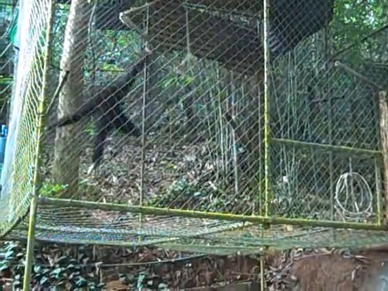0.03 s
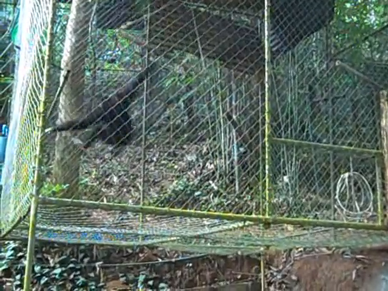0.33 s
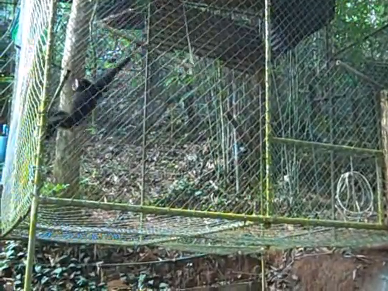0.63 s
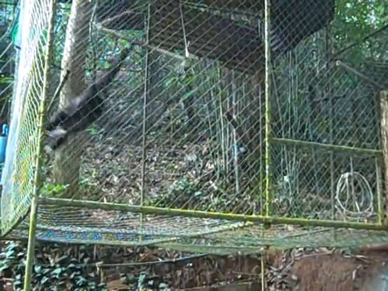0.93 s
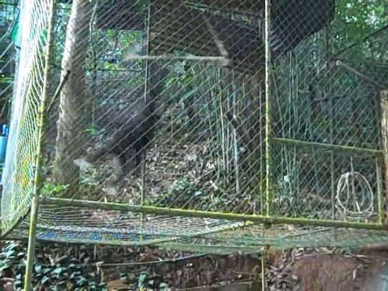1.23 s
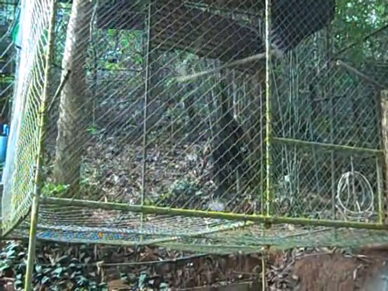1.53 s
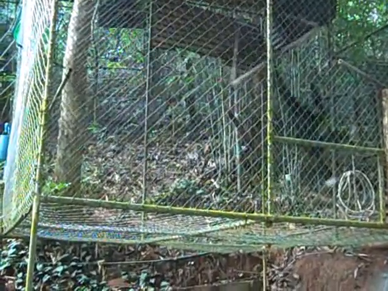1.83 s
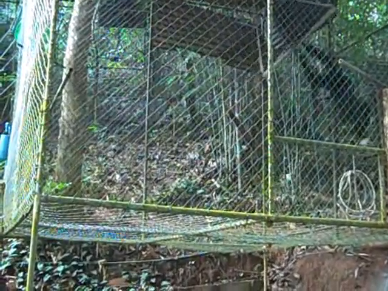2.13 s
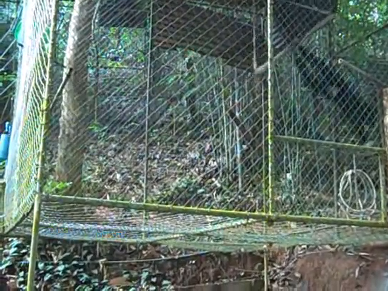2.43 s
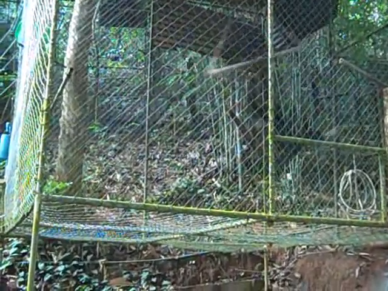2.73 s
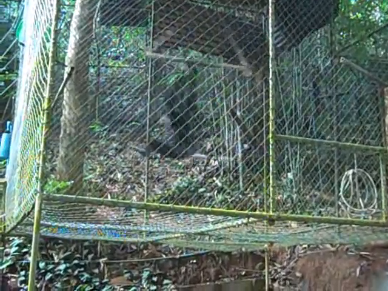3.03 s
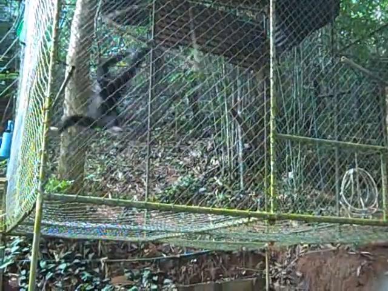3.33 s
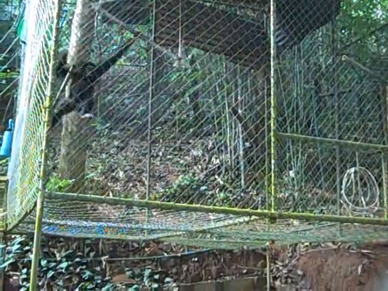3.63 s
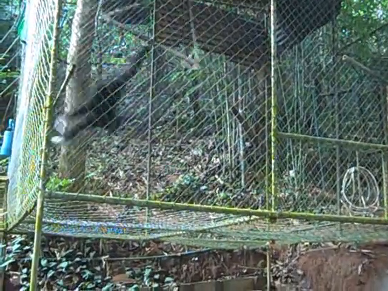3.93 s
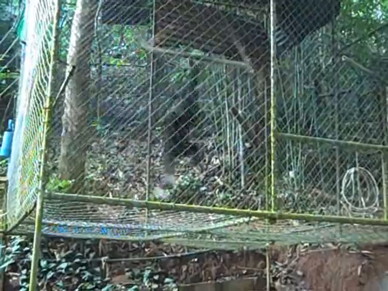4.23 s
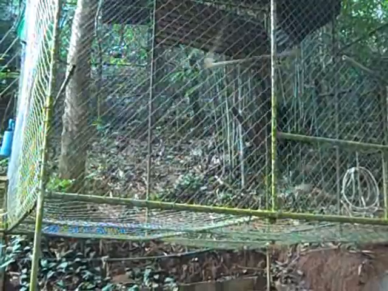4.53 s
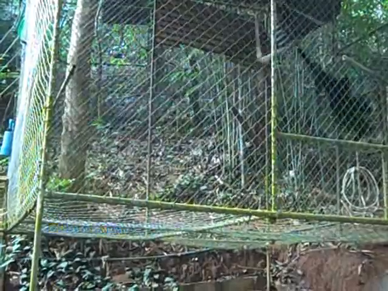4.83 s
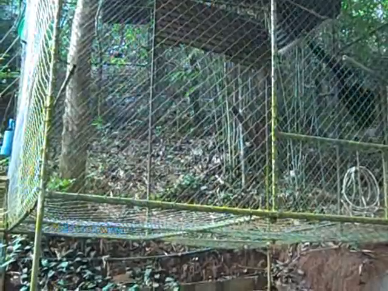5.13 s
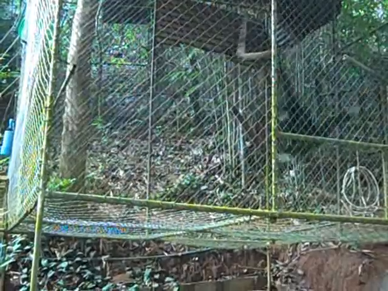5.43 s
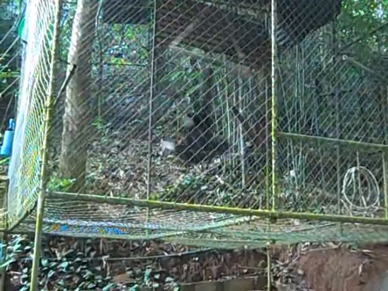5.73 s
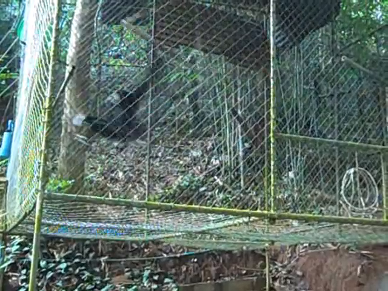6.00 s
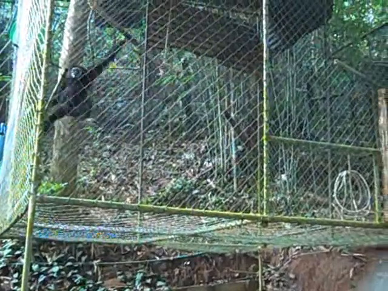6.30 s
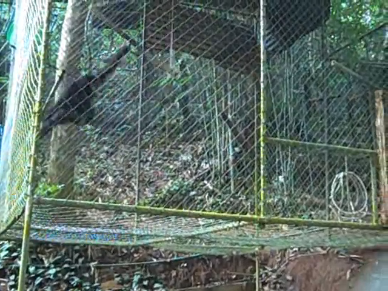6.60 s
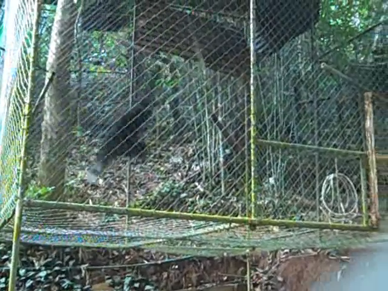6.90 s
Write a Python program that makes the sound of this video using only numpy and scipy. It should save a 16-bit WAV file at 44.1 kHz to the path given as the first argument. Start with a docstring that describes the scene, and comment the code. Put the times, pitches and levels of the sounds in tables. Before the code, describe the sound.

A gibbon gives four loud rising whoops, a sinking moan and two soft hoots, over droning forest cicadas and faint wire cage ticks.

```python
"""A gibbon gives four loud rising whoops, the last sinking to a moan, then two soft hoots.
Its voice is an almost pure tone that beats against echoes from roof and ground and lingers in the trees.
The wire mesh of its cage ticks and squeaks as it swings about.
Cicadas drone in the forest all round, and soft low pops come in short runs."""
import sys
import numpy as np
from scipy import signal
from scipy.fft import rfft, irfft, next_fast_len
from scipy.io import wavfile
from scipy.ndimage import uniform_filter1d, minimum_filter1d

SR = 44100
rng = np.random.default_rng(int(sys.argv[2]) if len(sys.argv) > 2 else 0)


def bounce(signal):
    """Save signal as a 16-bit WAV file at the path given by the first command-line argument."""
    frames = np.transpose(np.atleast_2d(signal))
    limited = np.clip(frames, -1, 1)
    pcm = np.round(limited * 32767).astype(np.int16)
    wavfile.write(sys.argv[1], SR, pcm)


N = 306936
LEAD = SR  # samples of song before time zero
TIME = np.arange(-LEAD, N) / SR
TOP_HZ = 15500

# Whoops; the first ends before time zero, so only its echo is heard. The last three columns set overtones.
# start_s, shelf_s, top_s, end_s, start_hz, low_hz, shelf_hz, top_hz, sagged_hz,
# climb_power, quaver_share, level_db, sag_db, second_db, third_db, upper_db
WHOOP_SHAPES = [(-.56, -.38, -.28, -.1, 900, 870, 1210, 1320, 1240, 1.7, .02, -1, -3, 0, -4, -3),
                (.283, .462, .505, .59, 1000, 892, 1335, 1500, 1505, 2.0, .008, .2, -2.5, .5, -3, 2),
                (.853, 1.035, 1.138, 1.315, 880, 872, 1245, 1380, 1290, 1.5, .018, 2, -6.5, -2, -1, .5),
                (1.668, 1.85, 1.965, 2.11, 780, 870, 1272, 1498, 1490, 1.1, .012, -1, .3, .5, -3, -.5),
                (2.388, 2.565, 2.68, 2.862, 790, 778, 1180, 1250, 1165, 2.0, .035, -1.5, -2.5, -1, -1.5, .5)]
# Higher notes are sung harder, until the strained top: pitch_hz, level_db
LEVEL_BY_PITCH = [(780, -22.5), (890, -19.5), (1030, -15), (1250, -11.5), (1400, -11.5), (1520, -14.7)]
# The four soft calls, each a free glide: time_s, pitch_hz, level_db
MOAN = [(2.835, 1120, -11.5), (2.88, 1016, -16.5), (2.93, 1000, -23), (2.96, 860, -22.5), (3.0, 790, -19),
        (3.11, 695, -34), (3.23, 664, -29.5), (3.41, 680, -31), (3.59, 565, -44)]
GRUNT = [(3.94, 520, -61), (3.97, 457, -49), (4.01, 429, -54)]
HOOT_1 = [(3.87, 484, -49), (3.98, 620, -35), (4.055, 820, -23.5), (4.18, 855, -26.5), (4.235, 735, -25),
          (4.31, 685, -39), (4.38, 588, -30.5), (4.44, 533, -47), (4.58, 475, -55)]
HOOT_2 = [(4.975, 476, -52), (5.04, 575, -41), (5.1, 680, -32), (5.14, 820, -24), (5.175, 930, -28.5),
          (5.26, 869, -29), (5.31, 779, -28), (5.35, 703, -40), (5.46, 650, -49)]
# Each soft call with its overtones: glide, second_db, third_db, upper_db
SOFT_CALLS = [(MOAN, 0, -1, 0), (GRUNT, -6, -6, -4), (HOOT_1, -1, -2.25, 0), (HOOT_2, -4.5, -1.5, 3)]
# How a wide-open mouth and rounded lips pass overtones: frequency_hz, gain_db
OPEN_MOUTH = [(1500, -23), (1780, -10), (1940, -10), (2230, -26), (2700, -28.5), (3050, -27), (3550, -34.5),
              (3950, -23.5), (4500, -20.5), (5000, -33), (5700, -27), (7200, -29), (8900, -30.5),
              (9900, -41), (13000, -48)]
ROUND_LIPS = [(1000, -35), (1400, -25.5), (1700, -21), (2000, -38), (3700, -40), (4150, -35), (4550, -22),
              (5300, -37), (6700, -44), (7550, -26), (9000, -37), (10400, -29.5), (12000, -48)]
# Echoes from roof, ground and bank: delay_s, gain_db
ECHOES = [(.0125, -6.5), (.028, -8.5), (.052, -10), (.074, -13), (.118, -17.5)]
# Soft soil swallows the lows of echoes, and leaves dull their highs: frequency_hz, gain_db
SOIL_TONE = [(500, -3), (900, 0), (1300, 1), (1550, 3)]
LEAF_TONE = [(1500, 0), (4400, 0), (6000, -4), (10000, -5)]
# Tugs on the wire mesh, and squeaks of slipping wire: start_s, level_db
MESH_TICKS = [(0.206, -44), (3.482, -44), (3.7519, -39.5), (3.7894, -48), (3.9563, -43), (4.6643, -50),
              (5.6054, -34.5), (6.2113, -48), (6.6987, -47), (6.7344, -47.5)]
MESH_SQUEAKS = [(4.67, -65), (5.615, -56), (6.215, -56)]
# Where the mesh rings: pitch_hz, width_hz, level_db
MESH_RINGS = [(7250, 580, -2), (8400, 970, -3), (11200, 3800, -3)]
# Runs of soft low pops: start_s, length_s, level_db
POP_RUNS = [(.128, .05, -46), (.462, .05, -42), (.915, .12, -47), (1.112, .1, -45), (1.215, .01, -35),
            (1.577, .26, -48), (2.012, .085, -47), (2.433, .05, -46)]
# The tones of the nearest cicada: pitch_hz, width_hz, level_db, swell_db
NEAR_CICADA = [(2965, 40, -59.5, 4), (3500, 45, -73.5, 2), (5900, 45, -68.5, 11.5), (6460, 50, -80, 13),
               (8880, 60, -78, 9.5), (9430, 70, -83, 0)]
# How hard it sings: time_s, effort (0 to 1)
CICADA_EFFORT = [(0, 0), (5.2, 0.52), (5.9, 0.84), (6.96, 0.99)]
# The drone of far cicadas: pitch_hz, width_hz, level_db
FAR_CICADAS = [(2877, 290, -56.5), (5414, 370, -61), (5644, 410, -57), (8600, 470, -72.5)]
# The hush of forest air and distant insects: frequency_hz, gain_db
AIR_TONE = [(25, -13.5), (50, -15.5), (80, -15), (150, -15.5), (270, -12), (400, -6.5), (550, -6),
            (850, -.7), (1500, -3.6), (2200, -4.5), (3700, -11.6), (4700, -10.2), (6800, -18), (8500, -22),
            (10500, -25), (13000, -27.5), (15000, -33)]
# The tone of the faint fizz on loud sounds: frequency_hz, gain_db
FIZZ_TONE = [(100, 0), (600, -0.5), (3000, 4), (8000, -0.5), (15000, -3.0)]


def gibbon():
    """The whoops and soft calls, ringing through the cage and trees."""
    whoops = sum(voice(whoop(*shape), second, third, upper) for *shape, second, third, upper in WHOOP_SHAPES)
    soft_calls = sum(voice(*call) for call in SOFT_CALLS)
    return echoes(whoops + soft_calls)


def whoop(start_s, shelf_s, top_s, end_s, start_hz, low_hz, shelf_hz, top_hz, sagged_hz,
          climb_power, quaver_share, level_db, sag_db):
    """One whoop as rows of time, pitch and level: it climbs to a shelf, steps up, sags and lets go."""
    scoop_s, step_s, swell_s, let_go_s, quaver_hz = .04, .048, .042, .045, 9.5
    t = np.linspace(start_s, end_s, 200)
    ramp = lambda begin, finish: np.interp(t, [begin, finish], [0, 1])
    scoop = 1 - ramp(start_s, start_s + scoop_s)
    climb = ramp(start_s + scoop_s, shelf_s) ** climb_power
    step = ramp(top_s - step_s, top_s)
    sag = ramp(top_s, end_s - let_go_s)
    let_go = ramp(end_s - let_go_s, end_s)
    hz = low_hz + (start_hz - low_hz) * scoop + (shelf_hz - low_hz) * climb
    hz += (top_hz - shelf_hz) * step + (sagged_hz - top_hz) * sag
    quaver = quaver_share * step * np.cos(2 * np.pi * quaver_hz * (t - top_s))
    swell = ramp(start_s, start_s + swell_s)
    shape_db = -15 * (1 - swell) + sag_db * sag - 24 * let_go ** 2.5
    db = level_db + np.interp(hz, *np.transpose(LEVEL_BY_PITCH)) + shape_db
    hz *= 1 + quaver - .15 * let_go ** 1.5  # the pitch falls before the level does
    return np.transpose([t, hz, db])


def voice(glide, second_db, third_db, upper_db, jitter=.003, waver_db=2.0, shimmer_db=2.7, rasp=.9):
    """One call: a strong tone whose weak overtones light up as they cross the mouth's resonances."""
    times, pitches, levels = np.transpose(glide)
    singing = (TIME > times[0]) & (TIME < times[-1])
    t = TIME[singing]
    hz = uniform_filter1d(np.interp(t, times, pitches), size=700)
    hz *= 1 + jitter * wander(110.5, len(t))
    db = np.interp(t, times, levels)
    opening = np.interp(db, [-27, -22], [0, 1])  # the mouth opens for loud notes
    strain = np.interp(hz, [1370, 1500], [0, 1])  # top notes skew the wave, adding even harmonics
    bright_db = opening * np.interp(hz, [900, 1250, 1500], [-4, 0, 3])  # higher is brighter
    release = np.interp(t[-1] - t, [.03, .048], [1, 0])  # overtones flare as the voice lets go
    phase = 2 * np.pi * np.cumsum(hz) / SR
    tone = np.sin(phase)
    for k in range(2, 13):
        if k == 2:
            overtone_db = second_db + 11 * release
        else:
            overtone_db = (third_db if k == 3 else upper_db - 10) + bright_db + 6 * release
        overtone_db += waver_db * wander(25.13, len(t))
        if k % 2 == 0:
            overtone_db += 12 * strain * np.sqrt(2 / k)
        mouth = opening * gain_at(k * hz, OPEN_MOUTH) + (1 - opening) * gain_at(k * hz, ROUND_LIPS)
        overtone = np.sin(k * phase + rasp * wander(140, len(t)))
        tone += (k * hz < TOP_HZ) * from_db(overtone_db) * mouth * overtone
    fade = np.clip(np.minimum(t - t[0], t[-1] - t) / 0.0078, 0, 1)
    out = np.zeros(len(TIME))
    out[singing] = tone * fade * from_db(db + shimmer_db * wander(60, len(t)))
    return out


def echoes(song, cage_db=-7.3, cage_ring_s=0.56, trees_db=-12.2, trees_ring_s=1.6, build_s=0.022):
    """The direct song, a few clear echoes, quick scatter from the cage and a long tail from the trees."""
    t = np.arange(2 * SR) / SR
    response = np.zeros(len(t))
    for db, ring_s in ((cage_db, cage_ring_s), (trees_db, trees_ring_s)):
        fade = np.exp(-np.log(1000) * t / ring_s)  # 60 dB down after ring_s
        tail = rng.standard_normal(len(t)) * fade * (1 - np.exp(-t / build_s))
        response += from_db(db) * tail / np.linalg.norm(tail)
    response = colour(response, SOIL_TONE)
    for delay_s, db in ECHOES:
        response[int(delay_s * SR)] += from_db(db)
    response = colour(response, LEAF_TONE)
    response[0] += 1  # the direct sound stays crisp
    return signal.fftconvolve(song, response)[LEAD:LEAD + N]


def wire_mesh(tick_db=-12, rattle_db=1.0, squeak_hz=7230):
    """Each tug makes the wires chatter against each other; now and then one slips and squeaks."""
    wires = sum(from_db(db) * noise_band(hz, width_hz) for hz, width_hz, db in MESH_RINGS)
    tugs = uniform_filter1d(fading_hits(MESH_TICKS, decay_s=.028), size=700)
    slips = uniform_filter1d(fading_hits(MESH_SQUEAKS, decay_s=.07), size=700)
    squeaks = noise_band(squeak_hz, width_hz=130) * slips
    ticks = unit_level(wires) * tugs * from_db(tick_db - rattle_db * wander(450))
    return ticks + squeaks


def pops(gap_s=.0345, thud_db=-2, crackle_db=-6):
    """Small steps in pressure leak away, heard as dull pops with a brief crackle."""
    steps = [(s, db) for start, length, db in POP_RUNS for s in np.arange(start, start + length, gap_s)]
    thuds = fading_hits(steps, decay_s=.093)
    crackle = noise_band(350, width_hz=600) * fading_hits(steps, decay_s=.0039)
    return from_db(thud_db) * thuds + from_db(crackle_db) * crackle


def cicadas(drift_db=0.74):
    """Far cicadas drone, while a near one whines louder as it sings harder."""
    far = sum(from_db(db + drift_db * wander(12)) * noise_band(hz, width_hz)
              for hz, width_hz, db in FAR_CICADAS)
    effort = np.interp(TIME[LEAD:], *np.transpose(CICADA_EFFORT))
    near = sum(from_db(db + swell_db * effort) * noise_band(hz, width_hz)
               for hz, width_hz, db, swell_db in NEAR_CICADA)
    return far + near


def forest_air(level_db=-51.5, drift_db=1.2):
    """A soft hush of air and distant insects that gently wavers."""
    level = from_db(level_db + drift_db * wander(7.5))
    return level * unit_level(colour(rng.standard_normal(N), AIR_TONE))


def from_db(db):
    """Turn decibels into a gain."""
    return 10 ** (np.asarray(db) / 20)


def unit_level(x):
    """Scale to an average (rms) level of 1."""
    return x / np.sqrt(np.mean(x ** 2))


def gain_at(hz, curve):
    """Read the gain off a tone curve at these frequencies."""
    curve_hz, curve_db = np.transpose(curve)
    return from_db(np.interp(np.log(hz + 1), np.log(curve_hz), curve_db))


def colour(x, curve):
    """Filter a sound by a tone curve."""
    return irfft(rfft(x) * gain_at(np.fft.rfftfreq(len(x), 1 / SR), curve), len(x))


def noise_band(hz, width_hz):
    """Noise gathered around one pitch, at level 1."""
    size = next_fast_len(N)
    distance = 2 * (np.fft.rfftfreq(size, 1 / SR) - hz) / width_hz
    spectrum = rfft(rng.standard_normal(size)) / (1 + distance ** 2)
    return unit_level(irfft(spectrum, size)[:N])


def wander(rate_hz, size=N):
    """A smooth random drift, typically 1 away from zero."""
    hold = max(int(SR / rate_hz), 2)
    steps = np.repeat(rng.standard_normal(size // hold + 1), hold)
    return unit_level(uniform_filter1d(steps, hold)[:size])


def fading_hits(events, decay_s):
    """A level that jumps at each event and then dies away."""
    hits = np.zeros(N)
    for start_s, db in events:
        hits[np.searchsorted(TIME[LEAD:], start_s)] += from_db(db)
    return signal.lfilter([1], [1, -np.exp(-1 / (decay_s * SR))], hits)


def scene():
    """Gibbon, forest, cage and pops in one channel."""
    return (gibbon() + forest_air() + cicadas() + wire_mesh() + pops())[None]


def record(dry, fizz_db=-30.7, growth=1.2, grain_db=3.5, ceiling=.85):
    """A faint fizz rides on loud sounds, a limiter holds the peaks, and the highest treble is cut."""
    loudness = np.sqrt(np.abs(uniform_filter1d(dry[0] ** 2, size=1000)))
    fizz = unit_level(colour(rng.standard_normal(N), FIZZ_TONE))
    fizz *= loudness ** growth * from_db(fizz_db + grain_db * wander(900))
    allowed_gain = ceiling / np.maximum(np.abs(dry[0]), ceiling)
    gain = uniform_filter1d(minimum_filter1d(allowed_gain, size=400), size=400)
    treble_cut = signal.ellip(10, .2, 80, TOP_HZ, fs=SR, output="sos")
    return signal.sosfilt(treble_cut, dry * gain + fizz)


dry = scene()
out = record(dry)
bounce(out)
```